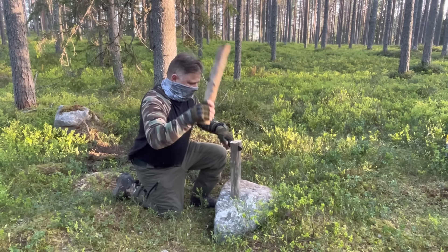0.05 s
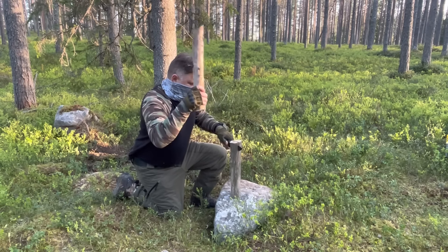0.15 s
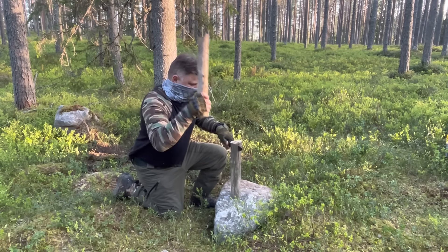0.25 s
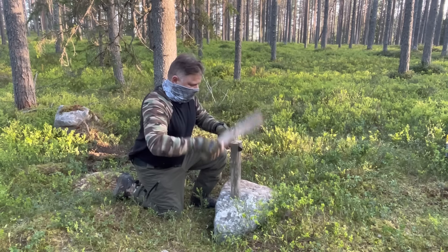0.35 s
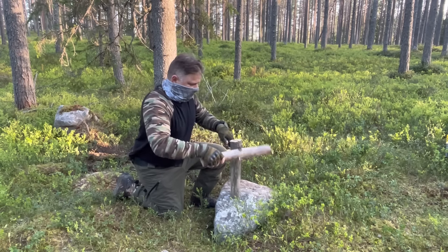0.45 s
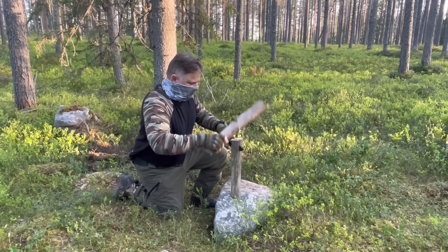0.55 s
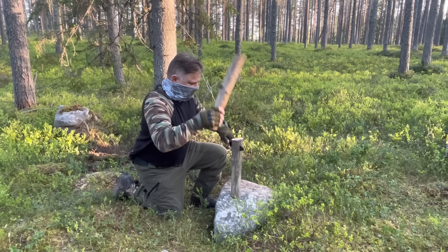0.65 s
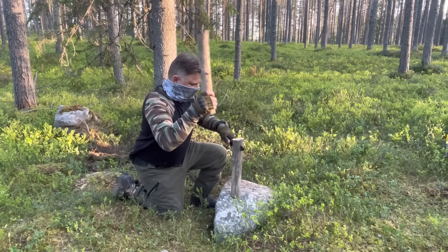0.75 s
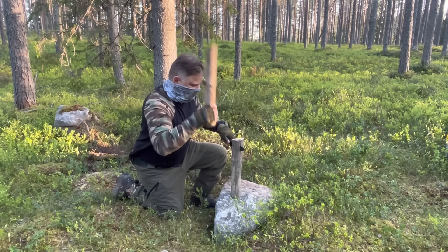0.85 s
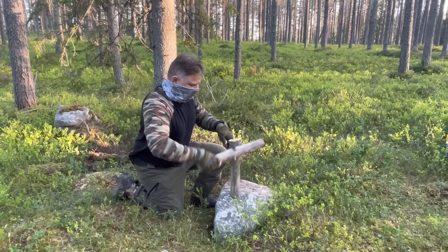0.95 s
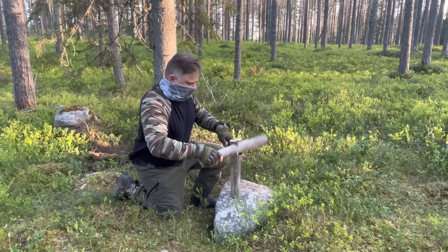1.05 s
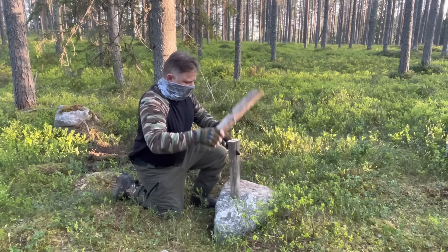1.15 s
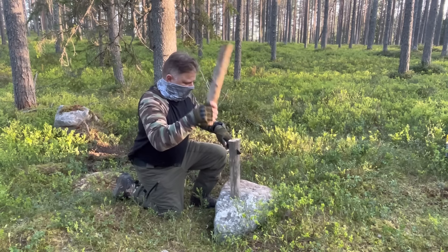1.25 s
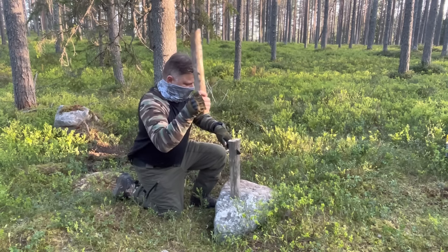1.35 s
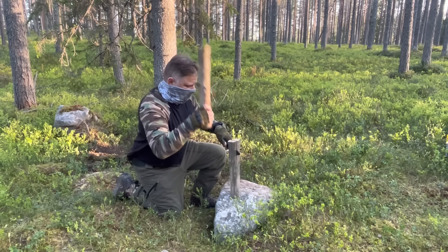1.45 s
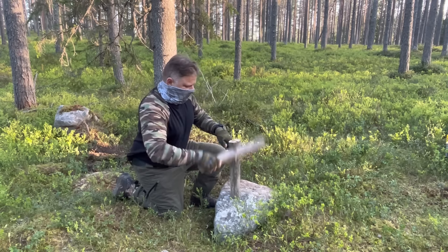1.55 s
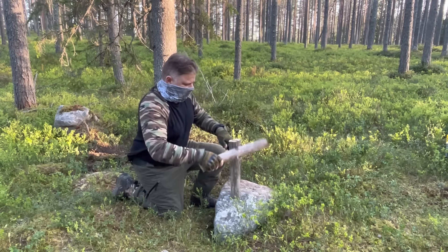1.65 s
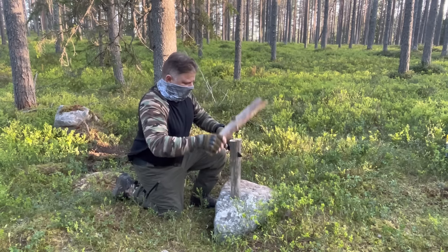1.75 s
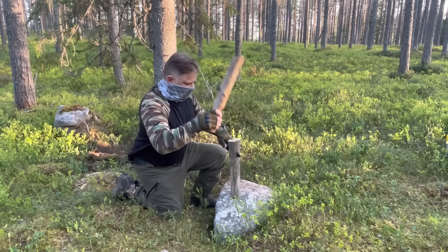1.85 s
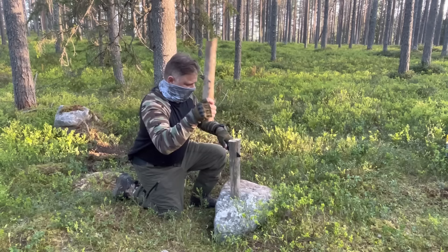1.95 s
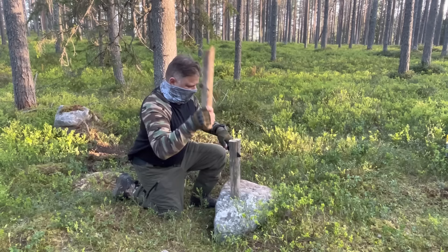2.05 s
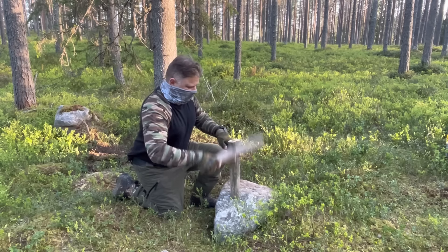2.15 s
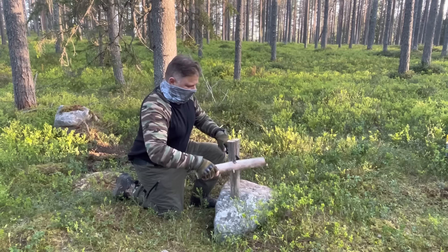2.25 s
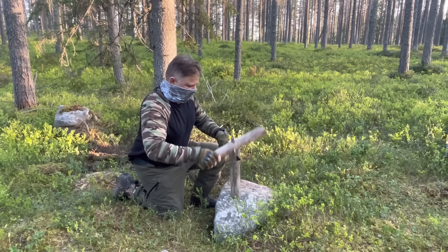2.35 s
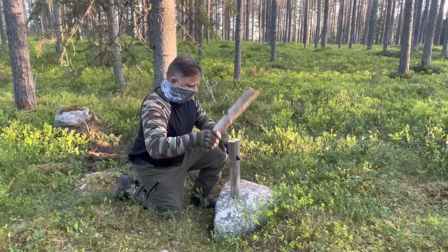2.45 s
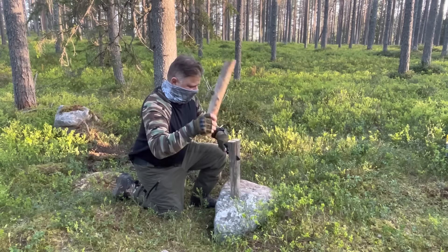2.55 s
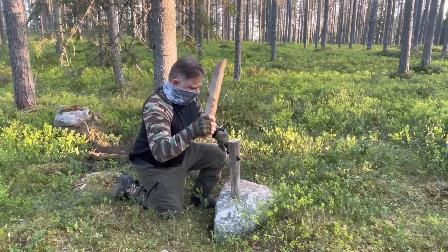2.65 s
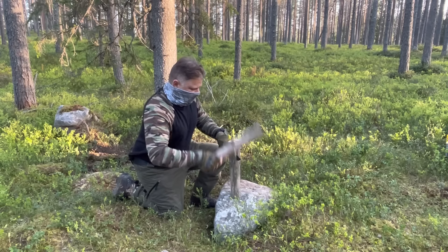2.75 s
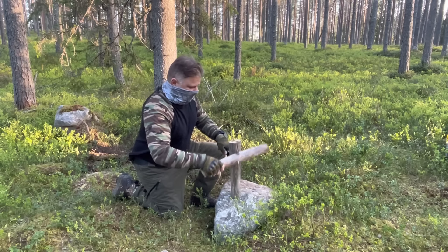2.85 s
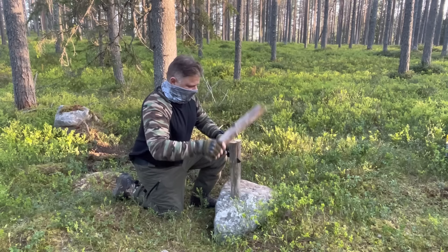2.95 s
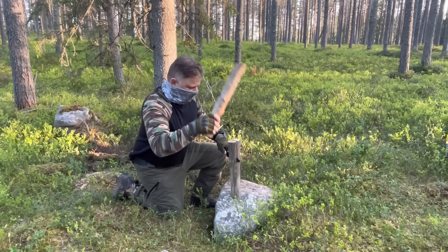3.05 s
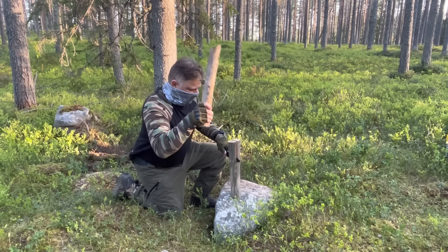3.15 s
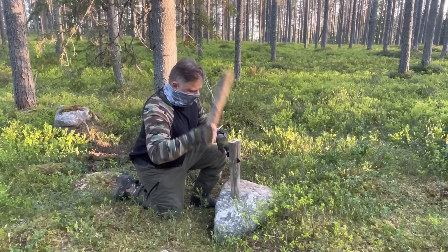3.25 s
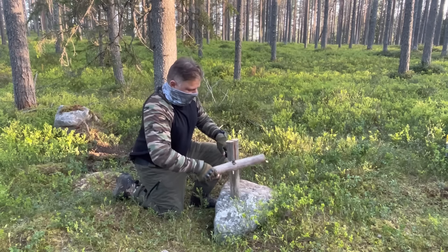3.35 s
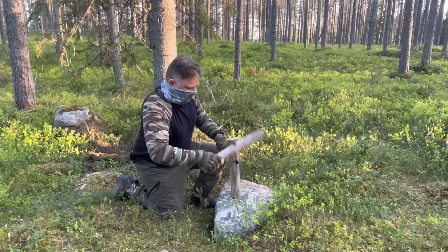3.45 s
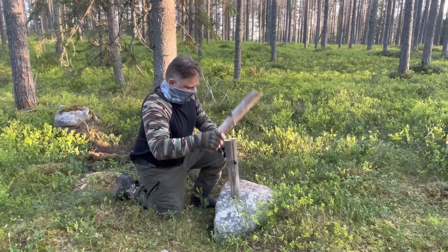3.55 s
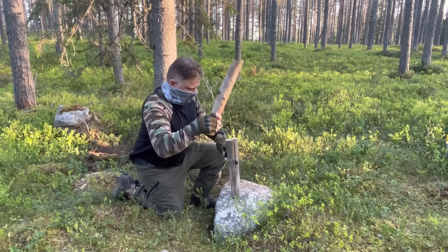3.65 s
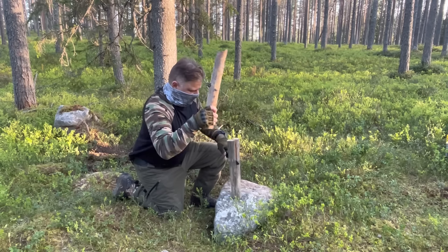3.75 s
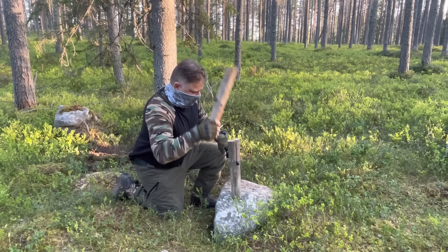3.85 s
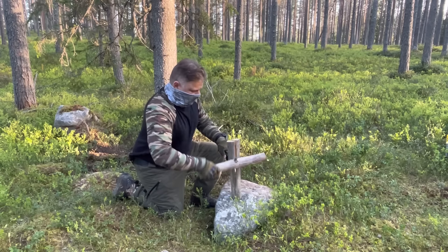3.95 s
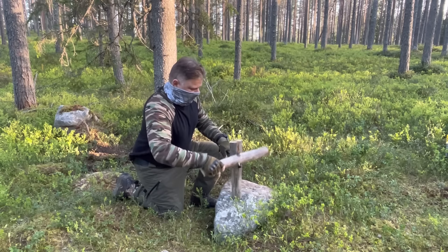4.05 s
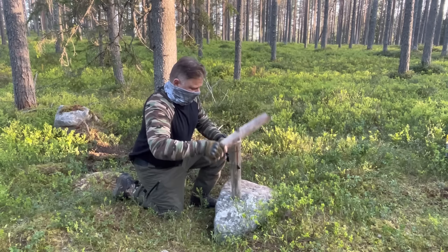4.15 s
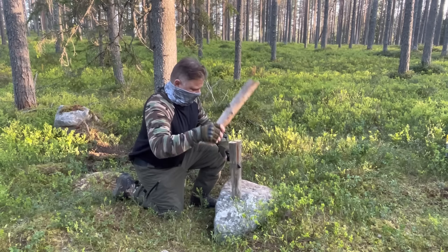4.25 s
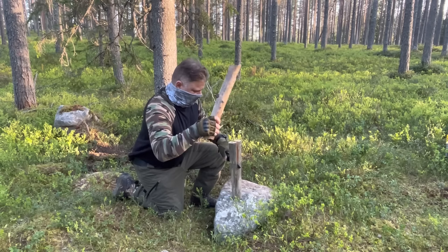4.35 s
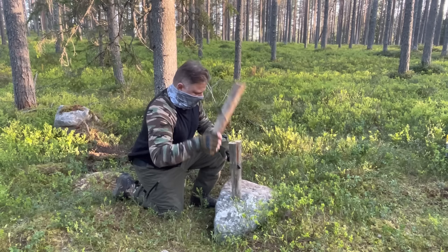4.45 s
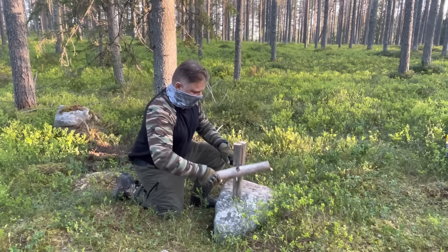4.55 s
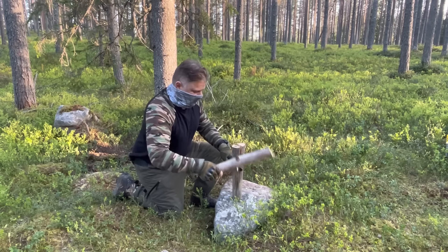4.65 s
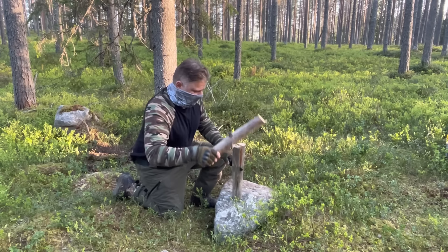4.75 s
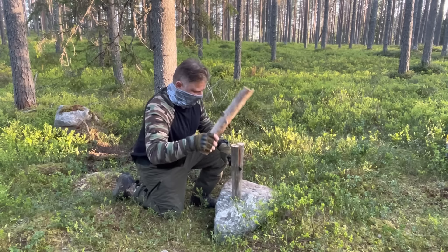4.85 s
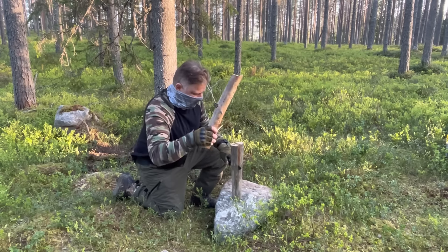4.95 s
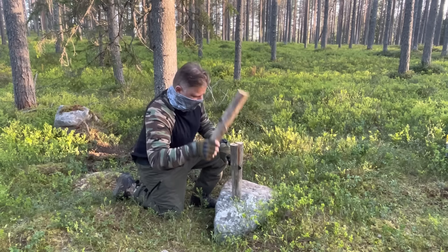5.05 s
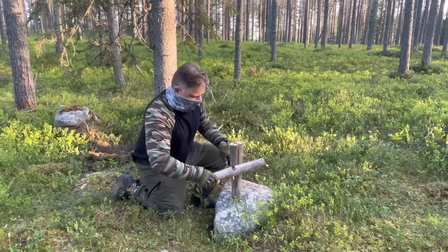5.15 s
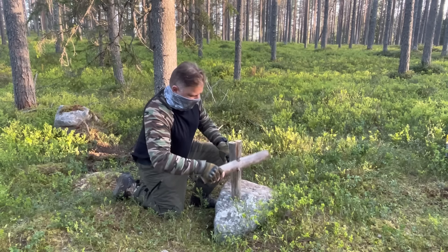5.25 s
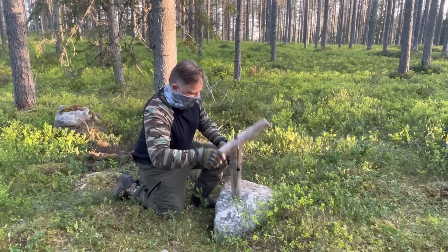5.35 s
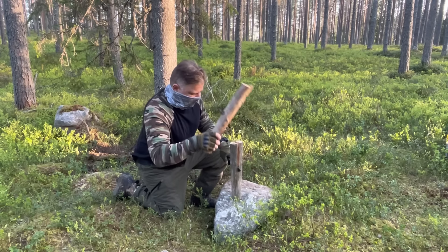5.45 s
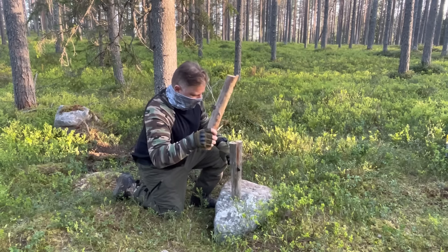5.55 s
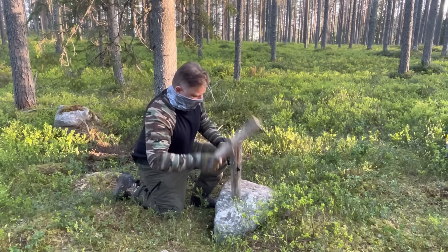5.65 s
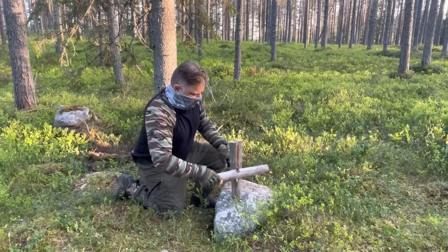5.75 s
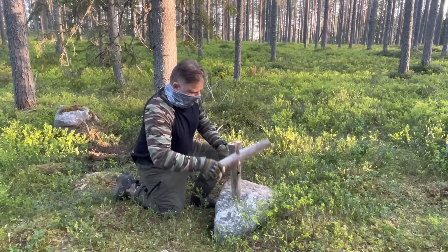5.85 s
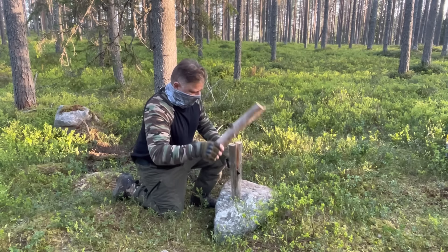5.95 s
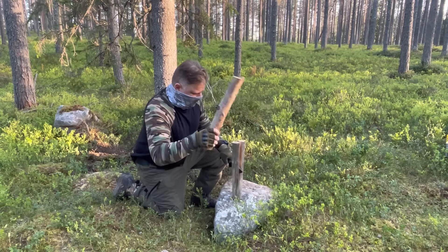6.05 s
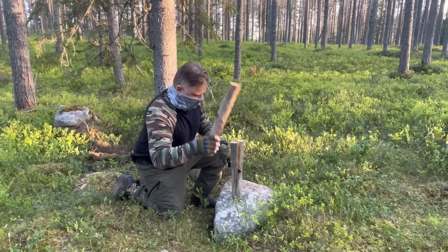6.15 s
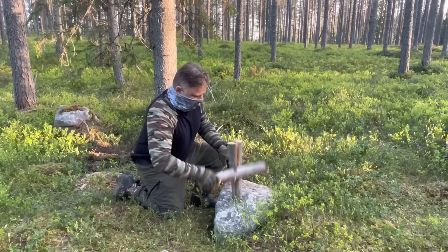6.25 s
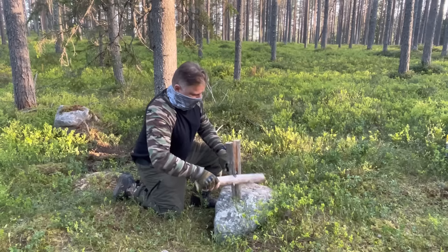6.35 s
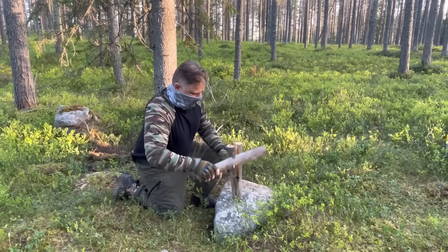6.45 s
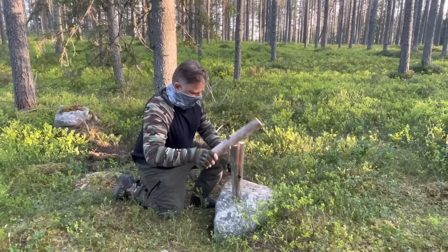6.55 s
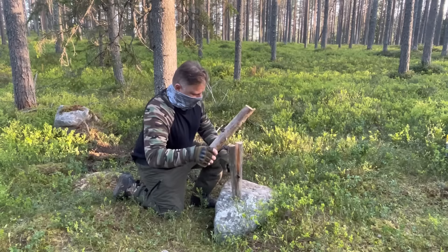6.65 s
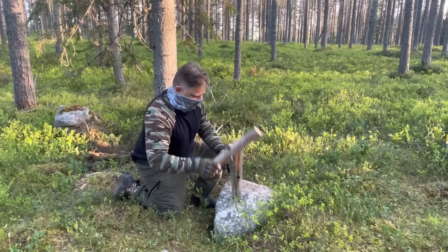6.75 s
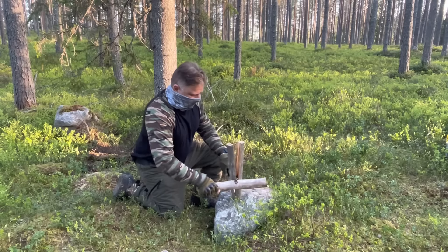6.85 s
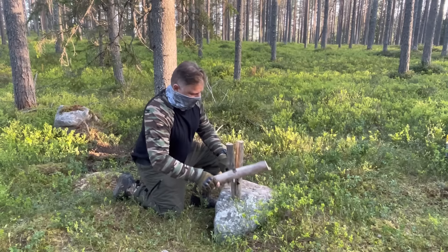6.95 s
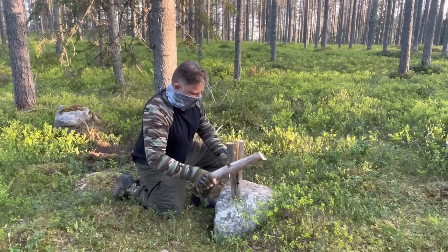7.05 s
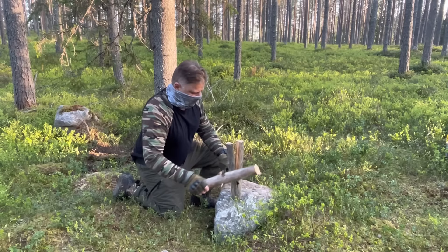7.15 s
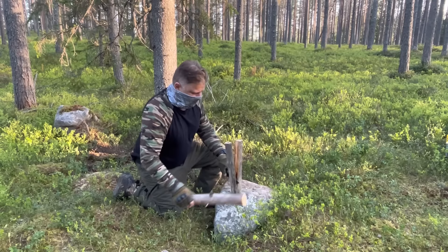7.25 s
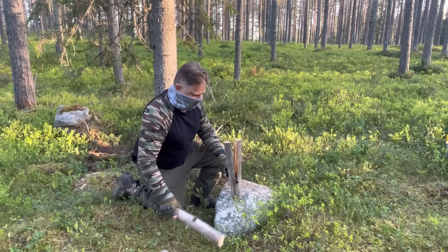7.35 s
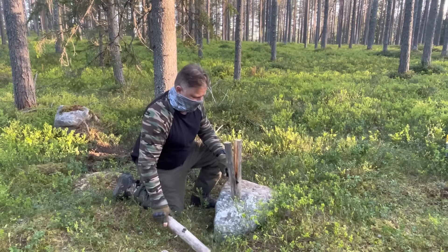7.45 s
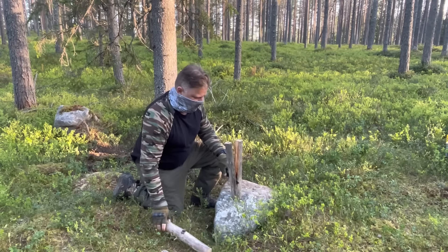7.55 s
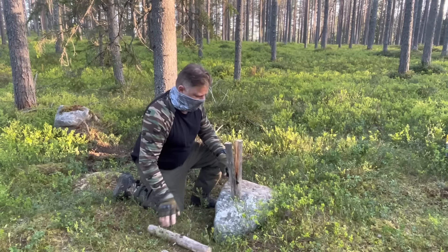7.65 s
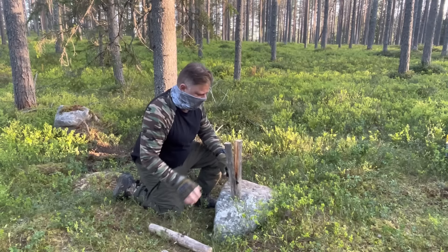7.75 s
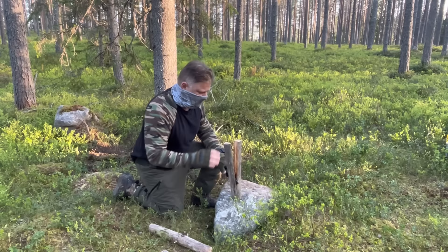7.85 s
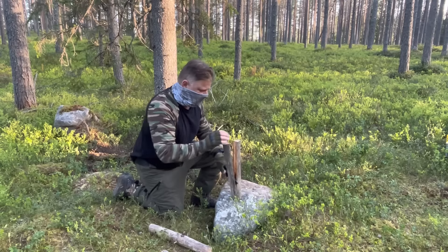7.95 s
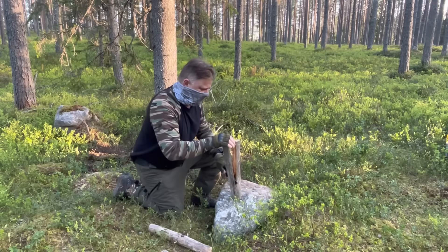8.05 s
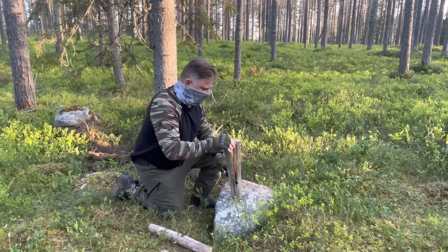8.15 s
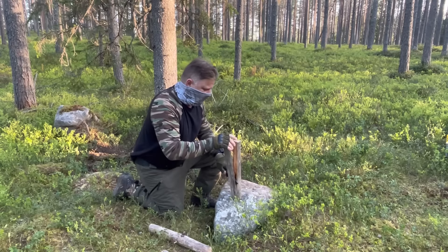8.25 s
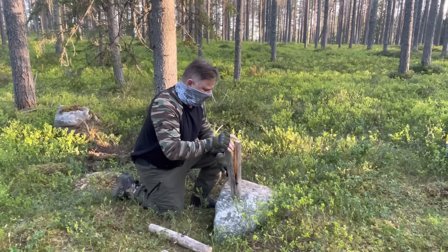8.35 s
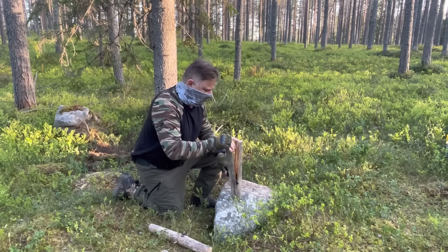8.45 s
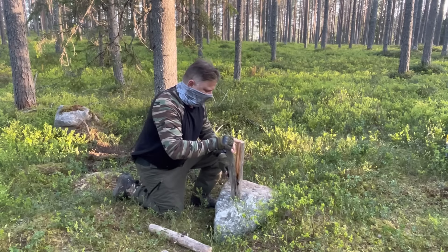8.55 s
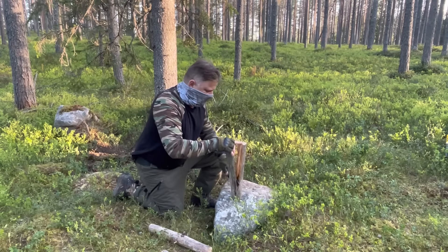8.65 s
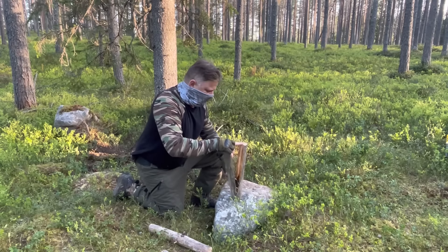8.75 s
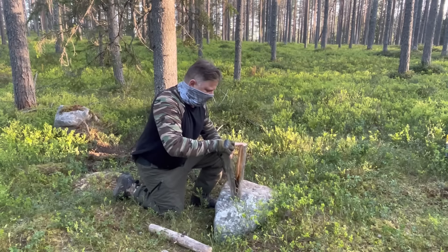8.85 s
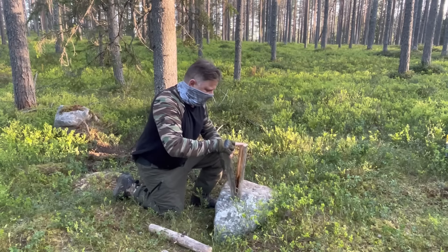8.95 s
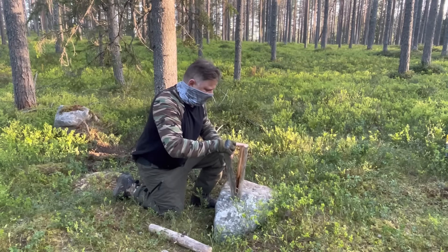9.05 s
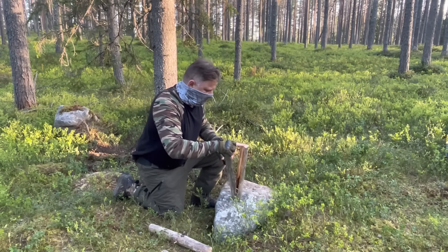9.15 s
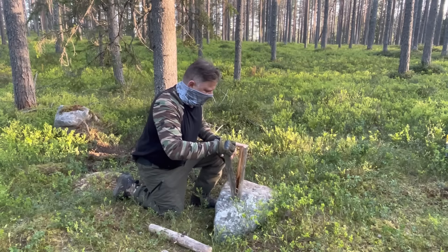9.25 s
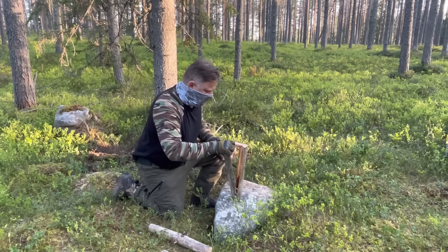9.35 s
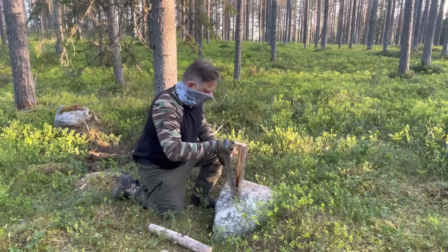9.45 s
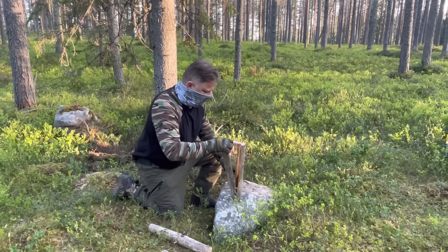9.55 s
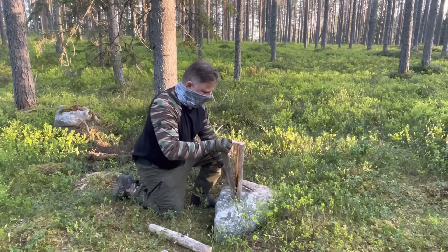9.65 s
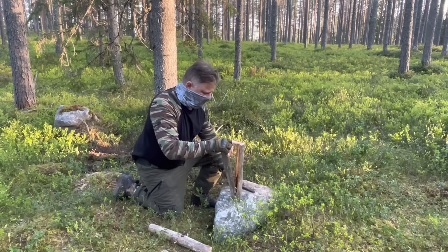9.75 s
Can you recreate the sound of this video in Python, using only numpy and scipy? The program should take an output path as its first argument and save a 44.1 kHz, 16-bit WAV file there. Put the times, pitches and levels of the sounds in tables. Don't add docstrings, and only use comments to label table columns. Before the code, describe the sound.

A wooden baton strikes in steady, hard, dry knocks, splitting a log in an echoing pine forest, then the halves are torn apart.

```python
import sys
import numpy as np
from scipy import signal
from scipy.fft import rfft, irfft, next_fast_len
from scipy.io import wavfile
from scipy.ndimage import uniform_filter1d, map_coordinates

SR = 44100
rng = np.random.default_rng(int(sys.argv[2]) if len(sys.argv) > 2 else 0)


def volts_from_db(level):
    exponent = np.asarray(level, float) / 20
    return 10 ** exponent


def int16_out(signal):
    q = np.round(np.clip(np.atleast_2d(signal).T, -1, 1) * 32767)
    wavfile.write(sys.argv[1], SR, q.astype(np.int16))


N = 432161

# t/s, level/dB
GUSTS = [(0, -64.5), (.45, -57), (.76, -64.5), (1.14, -59), (1.34, -64), (2.2, -60.5), (2.8, -62.5),
         (3.63, -63), (3.96, -55), (4.2, -65), (4.55, -57), (4.88, -62), (5.43, -62.5), (6.41, -59.5),
         (6.55, -64), (8.22, -63.5), (9.8, -65.5)]
# f/Hz, level/dB
BUFFET = [(5, -10), (12, 5.5), (25, -4.5), (40, -10), (60, -15), (100, -20), (250, -36.5), (500, -72)]
# f/Hz, level/dB
TREETOPS = [(88, -31), (150, -6), (250, -5.5), (539, -5.5), (1330, -5), (2650, -15), (15000, -21),
            (16500, -34.5)]
# f/Hz, t60/s
NEAR_TRUNKS = [(200, 0.11), (1000, 0.66), (4000, 0.43), (14000, 0.1)]
# f/Hz, t60/s
FAR_TRUNKS = [(200, .4), (600, 3), (1100, 1.7), (1700, 0.27), (2400, 1.1), (4000, 0.39), (14000, 0.56)]
# f/Hz, level/dB
BARK = [(200, -13), (960, -7), (1085, 0.5), (1230, -6), (1750, -3.5), (2350, 2.5), (2900, -2.5), (14000, 3)]
# t/s, peak level/dB, rise/(dB/s), fall/(dB/s)
RUSTLE = [
    (3.68, -52, 450, 1600),
    (7.427, -49, 440, 700),
    (7.47, -80, 400, 140),
    (7.642, -61, 90, 150),
    (8.58, -55, 828, 560),
    (8.66, -65.5, 150, 61),
    (8.735, -35.5, 2101, 802),
    (8.76, -65, 901, 402),
    (9.472, -64, 107, 131),
    (9.616, -75.5, 1203, 4003),
]
# f/Hz, level/dB
CLOTH = [(300, -6), (1200, 4.5), (3000, -1.5), (7000, -0.5), (15000, -10)]
# f/Hz, level/dB
SWISH = [(500, -19.5), (1500, -3), (2800, 0), (4500, -14.5), (9000, -30.5)]
# f/Hz, level/dB
ROCKING = [(30, -4.5), (90, -4), (350, 0), (600, -9.5), (1200, -38)]
# t/s, peak level/dB
TICKS = [(0.434, -51), (.46, -56.5), (.5035, -53.5), (0.642, -52.5), (0.6648, -52.5), (0.668, -50.5),
         (.9265, -51.5), (1.2141, -52.5), (1.6253, -49), (1.8804, -57), (1.8943, -60), (1.9415, -57),
         (2.0498, -58), (2.2227, -54), (2.5871, -57), (2.9343, -55.5), (3.432, -46.5), (4.0503, -49),
         (4.3209, -55), (5.1182, -51), (5.1862, -52.5), (5.1966, -50), (5.3544, -50.5), (5.7604, -49),
         (5.885, -49), (5.952, -48), (6.7713, -51.5), (6.8572, -45), (6.868, -44), (7.4253, -53)]
# t/s, peak level/dB, bright part level/dB
RIPS = [(8.5406, -58, 4), (8.5563, -57, 3), (8.5625, -54, -5), (8.57, -51, 9.5), (8.5774, -43, 1),
        (8.5863, -42, -3), (8.5966, -50, 1), (8.6212, -40.5, -1), (8.634, -58.5, 6), (8.6498, -45.5, -1.5),
        (8.6567, -44, -2), (8.6913, -45.5, -0.5), (8.7047, -32, 2), (8.7236, -24.5, -0.5),
        (8.7285, -35.5, -3.5), (8.7362, -31.5, -8), (8.7482, -34, 2), (8.765, -38.5, -6)]
# t/s, peak level/dB, dull part level/dB, bright part level/dB
SNAPS = [(0.0683, -40, 1.5, 4), (0.4827, -38.5, -15, 1), (0.591, -44.5, -8, -7), (.611, -48, 2.5, -27.5),
         (.877, -39, -4, -12), (1.0146, -25.5, -2.5, -10), (1.029, -45.5, -5, 3.5),
         (1.0385, -40, -10.5, -2.5), (1.1018, -46.5, -4, -3.5), (1.1192, -25.5, -5, -3),
         (1.4821, -38, -9.5, -6.5), (1.5334, -44.5, -3.5, -22), (1.6089, -45, -13.5, -3.5),
         (2.7975, -31.5, -13, -1), (2.8207, -36, .5, -4.5), (3.1176, -37.5, -11.5, -7),
         (3.3644, -42, 1, 0.5), (3.3899, -42, -16.5, 4), (3.3963, -38, -1.5, -2.5), (3.4017, -26, -6, -6.5),
         (4.1062, -45, -13, -3), (5.1607, -28, -11, -3), (5.287, -40.5, -4.5, 5), (5.3877, -38, -9, -12),
         (5.7423, -37.5, -8.5, -6.5), (5.9114, -32, -6.5, -15), (6.2905, -34, -2.5, -6),
         (6.2968, -42.5, -5.5, -5), (6.8453, -31.5, -2, -4.5), (6.8771, -38.5, -3.5, -1.5)]
# t/s, peak level/dB, bright part level/dB, t60/s
CRACKS = [(.3939, -12.5, -10, .0064), (.9694, -19, -4, .016), (.9737, -22, -6.5, .005),
          (1.5817, -14, -5, 0.012), (1.5888, -35, -2, .012), (2.169, -17, -13, .011),
          (2.1765, -22, -2, .0067), (2.7791, -19.5, -13.5, .012), (2.7829, -18, -3, .0095),
          (2.7848, -21.5, -3, .01), (3.3297, -12.5, -12, 0.01398), (3.3332, -23.5, -6, 0.0047),
          (3.9491, -30.5, -5, .016), (3.9553, -26, -0.5, .03), (3.9593, -28, 4.5, .022),
          (4.5193, -17, -14, .01), (4.5475, -15.5, -1.5, .005), (5.1373, -30, -5.5, .046),
          (5.1418, -20, -7, .011), (5.1493, -30, 0, .011), (5.7019, -12, -2.5, .016),
          (6.2626, -19.5, -5, .044), (6.267, -13, -0.5, .008), (6.2775, -19, -2, .01),
          (6.8082, -34.5, -5.5, 0.021), (6.8188, -18, -7, .0058), (6.8253, -22, -4.5, .02)]
# t/s, level/dB
TAPS = [
    (9.721, -35.5),
    (9.734, -40),
]
# f/Hz, width/Hz, level/dB
BLADE = [(538, 32, 2.5), (790, 280, 2), (1520, 550, -7), (2375, 300, -16), (3440, 48, 4), (5630, 65, -7)]
# t/s, level/dB
DROPS = [
    (7.392, -55),
    (7.417, -42.5),
    (7.428, -43.5),
    (7.469, -63),
    (7.63, -43.5),
    (7.756, -60),
]
# f/Hz, width/Hz, level/dB
LOOSE_BATON = [(1066, 58, -1), (1550, 44, -12), (2274, 55, 1.5), (3490, 35, -1), (6470, 42, -3)]
# t/s, level/dB, contact/ms
KNOCKS = [
    (8.578, -35, 0.16),
    (8.624, -43.5, 0.2),
    (8.706, -40, 0.16),
    (8.724, -30.5, 0.19),
    (8.74, -24.5, 0.09),
    (8.768, -38, 0.89),
    (8.786, -30.5, 0.47),
]
# f/Hz, width/Hz, level/dB
HALVES = [(318, 100, -17), (603, 180, -21), (960, 96, -6), (1318, 68, 10), (2420, 110, -2)]
# t/s, level/dB, contact/ms
THUDS = [
    (.415, -24, 2.2),
    (0.421, -34, 2.2),
    (2.532, -53.5, 1.1),
    (3.68, -44.5, 6.1),
    (7.44, -46.5, 5.4),
    (8.788, -32, 2),
]
# t/s, level/dB, contact/ms
GLANCE = (4.5193, -1, 0.27)
# f/Hz, width/Hz, level/dB
RIM = [(242, 120, -5), (704, 130, -12), (1410, 68, -1.5), (1450, 120, 2.5), (1966, 210, -2),
       (2760, 340, -8.5), (3367, 200, -10.5)]
# t/s, baton level/dB, log level/dB
GRAZES = [
    (.3931, -22, -26.5),
    (3.9495, -18, -20.5),
    (5.1374, -17.5, -21.5),
    (6.2615, -17.5, -15),
    (6.277, -17, -24),
    (6.8084, -21.5, -19.5),
    (6.8233, -16, -24),
]
# t/s, baton level/dB, baton overtones level/dB, log level/dB, contact/ms
BLOWS = [(0.3943, .5, -1.5, -1.5, 0.44), (.9695, 0, 1, 1.5, .34), (1.5818, -3.5, -5.5, -2, 0.69),
         (2.1686, 1, -9.5, -1.5, .45), (2.7798, 0.5, -1, -1.5, .45), (3.3297, 1.5, -5, 0.5, .64),
         (3.9563, -5, 1.5, -4.5, 0.49), (4.5487, -22, -3, -8.5, .58), (5.142, -8, 2, -1, .31),
         (5.699, -3.5, -4.5, 3.5, .32), (6.2625, -6.5, -2.5, -8.5, 0.66), (6.8182, -23, -5, -4.5, 0.44)]
# f/Hz, width/Hz, level/dB
BATON = [(1091, 140, -0.5), (1225, 47, -12), (1057.3, 38, -14), (2223, 190, -7), (3400, 200, -15.5),
         (5360, 440, -24), (7800, 300, -28)]
# f/Hz, width/Hz, level/dB
LOG = [(70.4, 95, -5.5), (160, 49, -17), (337, 55, 3), (361.1, 120, 5.5), (522, 110, 1.5), (720, 170, 5),
       (840, 200, -5.5), (1506, 37, -7.5), (2096, 810, -12.5), (2390, 120, -5), (2880, 190, 0.5)]

STRETCH = SR * 3 // 5
FIRST_TRUNK_S = 0.003
BLEND_HZ = 1290
GROUND_DB, GROUND_LAG_S = -2.53, 0.001767
SHUDDER_DB, SHUDDER_T60_S = -31, 0.065
DEEP_DB, DEEP_LOSS_DB_PER_S = 6, 0.87


def unit(x):
    return x / np.sqrt(np.mean(x ** 2) + 1e-20)


def along(points, hz):
    f, v = np.transpose(points)
    return np.interp(np.log(hz + 1), np.log(f + 1), v)


def curve(rows):
    return np.interp(np.arange(N) / SR, *np.transpose(rows))


def wobble(rate):
    knots = rng.standard_normal(int(N * rate / SR) + 4)
    return map_coordinates(knots, [np.arange(N) * rate / SR])


def filtered(x, response):
    m = next_fast_len(x.shape[-1] + 4096)
    spectrum = rfft(x, m) * response(np.fft.rfftfreq(m, 1 / SR))
    return irfft(spectrum, m)[..., :x.shape[-1]]


def noise(spectrum):
    return unit(filtered(rng.standard_normal(N), lambda hz: volts_from_db(along(spectrum, hz))))


def add(track, s, sound):
    part = track[round(s * SR):][:len(sound)]
    part += sound[:len(part)]


def air():
    lumps = volts_from_db(2 * wobble(6))
    wind = volts_from_db(curve(GUSTS) + 6.5) * unit(lumps * noise(BUFFET))
    hush = volts_from_db(0.76 * wobble(3)) * noise(TREETOPS)
    return wind + volts_from_db(-66) * hush


def trunks():
    hz, t, z = signal.stft(rng.standard_normal(SR * 3 // 2), SR, nperseg=256)
    single = volts_from_db(2.5 * unit(uniform_filter1d(rng.standard_normal(len(t)), size=2)))
    near_fade = volts_from_db(-57.5 - 60 * t / along(NEAR_TRUNKS, hz)[:, None])
    near = near_fade * (1 - np.exp(-t / 0.006)) * single
    far_fade = volts_from_db(-68.5 - 60 * t / along(FAR_TRUNKS, hz)[:, None])
    far = far_fade * (1 - np.exp(-t / 0.04))
    echoes = signal.istft(z * np.hypot(near, far), SR, nperseg=256)[1]
    return filtered(echoes, lambda f: volts_from_db(along(BARK, f)))


def ground(x):
    def moss(hz):
        return volts_from_db(GROUND_DB) * 1j * hz / (260 + 1j * hz) / (1 + 1j * hz / 2400)

    return filtered(x, lambda hz: moss(hz) * np.exp(-2j * np.pi * hz * GROUND_LAG_S))


def forest(x):
    out = x + ground(x)
    hz, _, z = signal.stft(x, SR, nperseg=256)
    even_power = uniform_filter1d(np.abs(z) ** 2, size=7, axis=0)
    even = np.sqrt(np.abs(even_power)) * np.exp(1j * np.angle(z))
    around = signal.istft(np.where(hz[:, None] > BLEND_HZ, even, z), SR, nperseg=256)[1]
    for start in range(0, N, STRETCH):
        echo = signal.fftconvolve(around[start:start + STRETCH], trunks())
        add(out, start / SR + FIRST_TRUNK_S, echo)
    return out


def rustle():
    t = np.arange(0, N / SR, 0.001)
    gain = sum(volts_from_db(db - rise * (s - t).clip(0) - fall * (t - s).clip(0)) for s, db, rise, fall in RUSTLE)
    clumps = volts_from_db(2.5 * wobble(300))
    return volts_from_db(-0.5) * curve(np.transpose([t, gain])) * unit(clumps * noise(CLOTH))


def swings():
    t = np.arange(N) / SR
    hard = [(s, log_db) for s, baton_db, _, log_db, _ in BLOWS if baton_db > -14]
    hiss = sum(volts_from_db(-72.5 - 150 * (s - t).clip(0)) * (t < s) for s, _ in hard)
    shudder = sum(volts_from_db(log_db + SHUDDER_DB - 60 * (t - s).clip(0) / SHUDDER_T60_S) * (t > s)
                  for s, log_db in hard)
    lumps = volts_from_db(3 * wobble(120))
    return hiss * noise(SWISH) + shudder * lumps * noise(ROCKING)


def spit(db, dull_db, bright_db, t60):
    t = np.arange(SR // 12) / SR
    fade = volts_from_db(-60 * t / max(t60, 0.002)) + volts_from_db(-17.0 - 60 * t / 0.025)
    onset = 1 - np.exp(-t / 0.00028)
    colour = [(600, dull_db - 29.5), (1500, dull_db + 6.0), (3000, dull_db + 5.5), (4000, 0.0011),
              (8500, 0.0008), (10000, bright_db + 2), (15500, bright_db - 3.0)]
    grit = filtered(rng.standard_normal(len(t)), lambda hz: volts_from_db(along(colour, hz)))
    return volts_from_db(db + 5.5) * grit * fade * onset


def snaps():
    track = np.zeros(N)
    for s, db in TICKS:
        add(track, s, spit(db, dull_db=-7, bright_db=-3, t60=0.008))
    for s, db, bright_db in RIPS:
        add(track, s, spit(db, -8.5, bright_db, t60=0.009))
    for s, db, dull_db, bright_db in SNAPS:
        add(track, s, spit(db, dull_db, bright_db, t60=0.0095))
    for s, db, bright_db, t60 in CRACKS:
        add(track, s, spit(db, 0.53, bright_db, 1.1 * t60))
    return track


def ring(modes, contact_ms):
    t = np.arange(SR // 8) / SR
    contact = max(contact_ms, 0.05) / 1000
    push = np.sin(np.pi * np.clip(t / contact, 0, 1))
    strength = volts_from_db(rng.standard_normal(len(modes)))

    def body(f):
        return sum(g * volts_from_db(db) * -1j * f * width / (hz * hz - f * f + 1j * f * width)
                   for g, (hz, width, db) in zip(strength, modes))

    x = filtered(push, body)
    return x / np.abs(x).max()


def handling():
    track = np.zeros(N)
    for s, db in TAPS:
        add(track, s, volts_from_db(db) * ring(BLADE, contact_ms=0.14))
    for s, db in DROPS:
        add(track, s, volts_from_db(db) * ring(LOOSE_BATON, contact_ms=0.11))
    for s, db, contact_ms in KNOCKS:
        add(track, s, volts_from_db(db) * ring(HALVES, contact_ms))
    for s, db, contact_ms in THUDS:
        add(track, s, volts_from_db(db) * ring(LOG, contact_ms))
    return track


def glance():
    track = np.zeros(N)
    s, db, contact_ms = GLANCE
    add(track, s, volts_from_db(db) * ring(RIM, contact_ms))
    return track


def blows():
    track = np.zeros(N)
    grazes = [(s, baton_db, -0.5, log_db, 0.19) for s, baton_db, log_db in GRAZES]
    for s, baton_db, overtone_db, log_db, contact_ms in BLOWS + grazes:
        deep_db = DEEP_DB - DEEP_LOSS_DB_PER_S * s
        baton = [(hz, width, db + overtone_db * (hz > 1500)) for hz, width, db in BATON]
        log = [(hz, width, db + deep_db * (hz < 480)) for hz, width, db in LOG]
        add(track, s, volts_from_db(baton_db) * ring(baton, contact_ms) + volts_from_db(log_db) * ring(log, contact_ms))
        add(track, s, spit(baton_db - 23.5, dull_db=-4.0, bright_db=-7.5, t60=0.03))
    return track


def scene():
    wood = blows() + glance() + handling()
    return (forest(wood + snaps()) + swings() + rustle() + air())[None]


def low_pass(x):
    return signal.sosfilt(signal.butter(12, 16770, fs=SR, output="sos"), x)


def record(dry):
    clipped = 0.97 * dry / (1 + np.abs(dry) ** 12) ** (1 / 12)
    band = filtered(clipped, lambda hz: 1 / (1 + (hz / 15900) ** 60))
    return low_pass(band)


dry = scene()
out = record(dry)
int16_out(out)
```